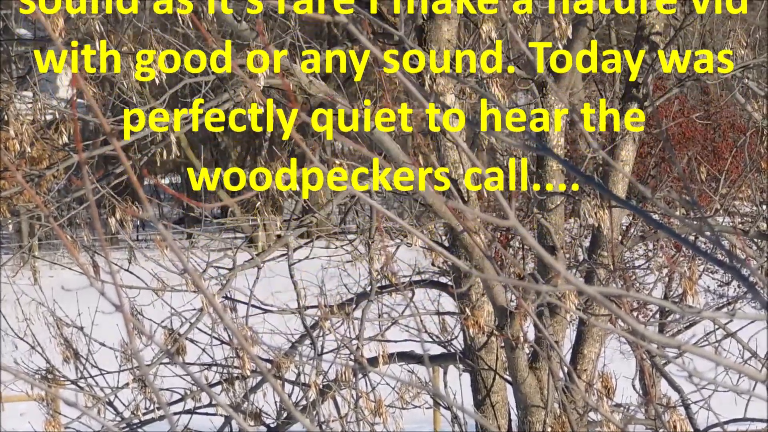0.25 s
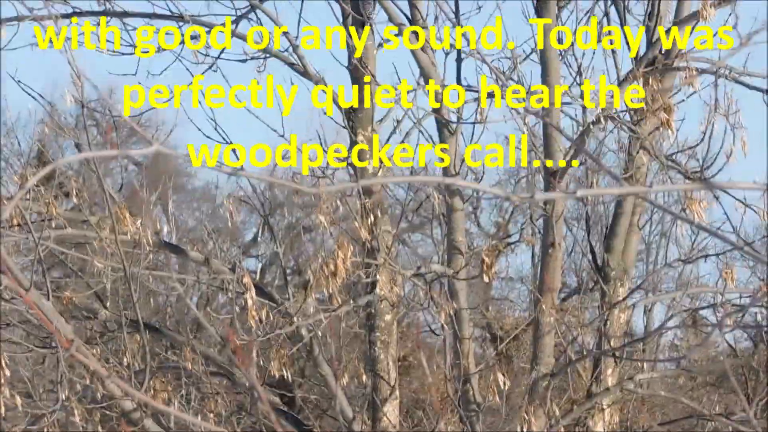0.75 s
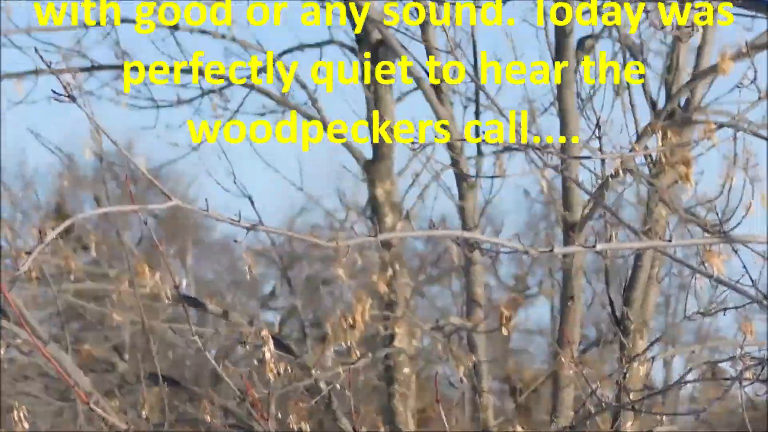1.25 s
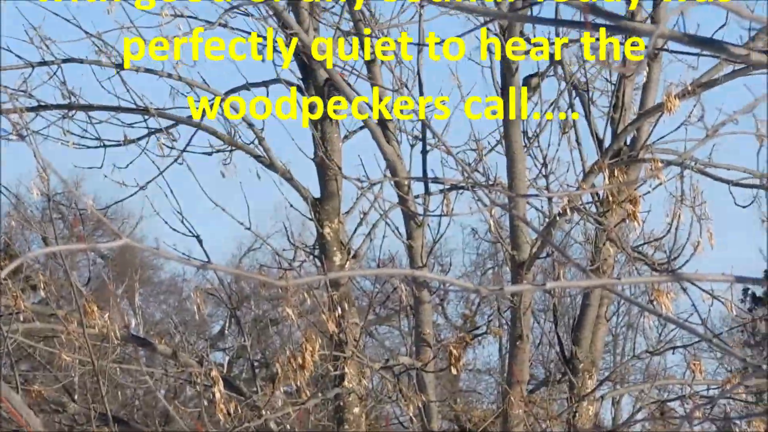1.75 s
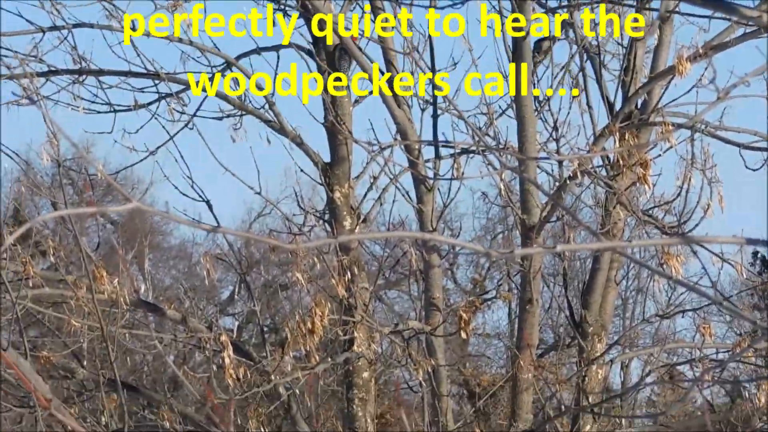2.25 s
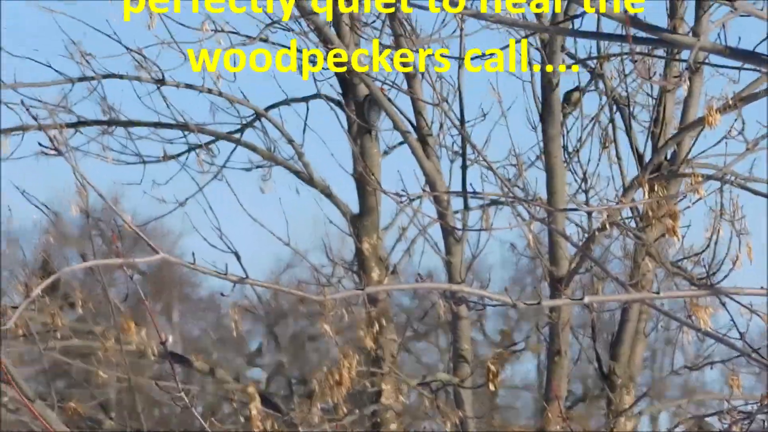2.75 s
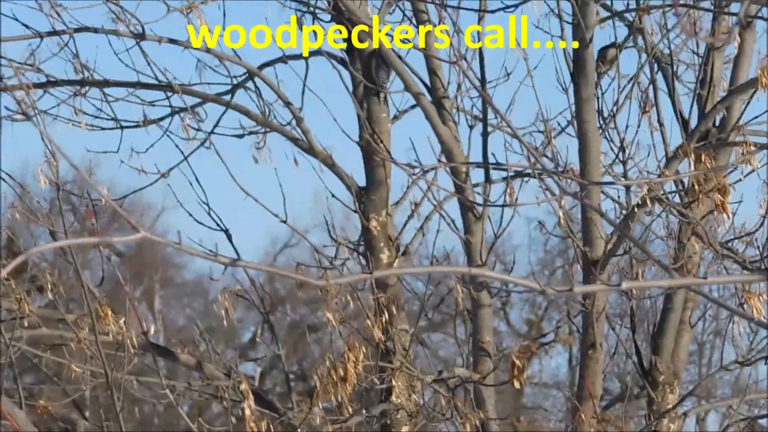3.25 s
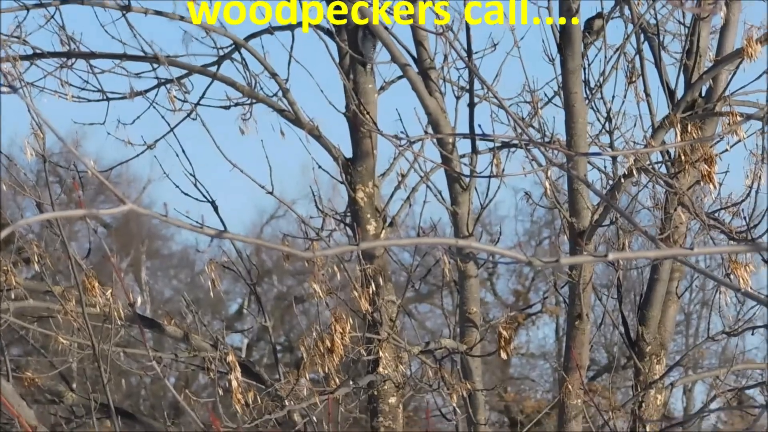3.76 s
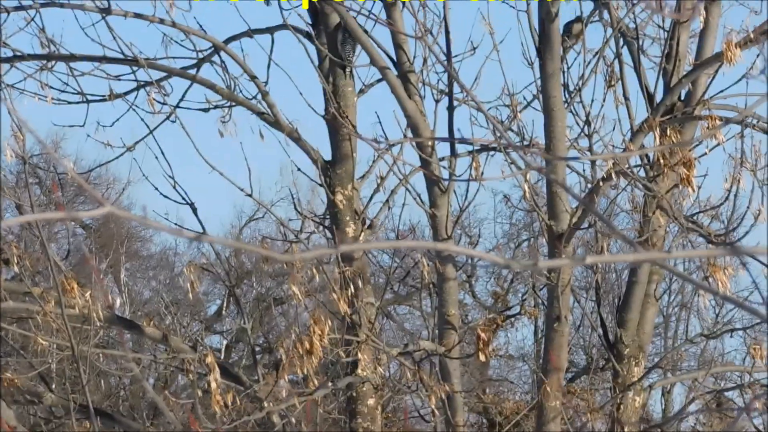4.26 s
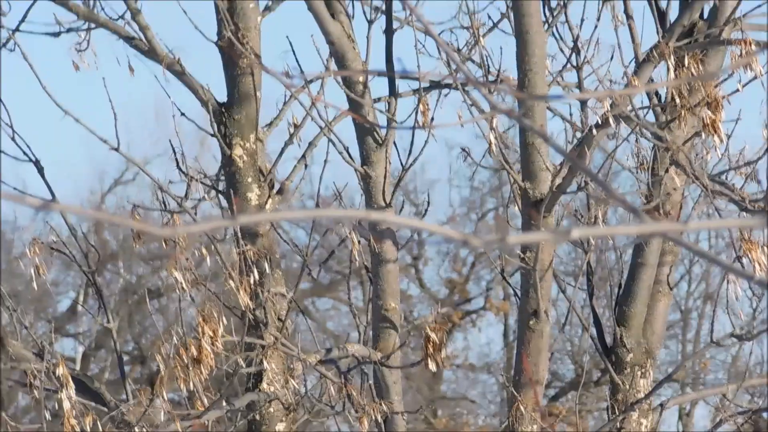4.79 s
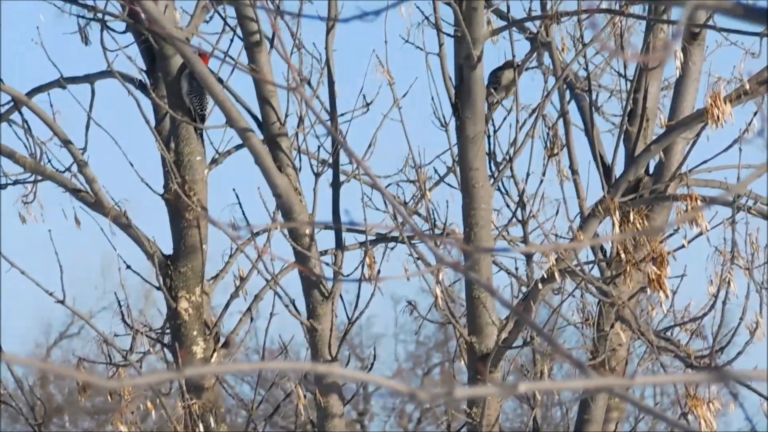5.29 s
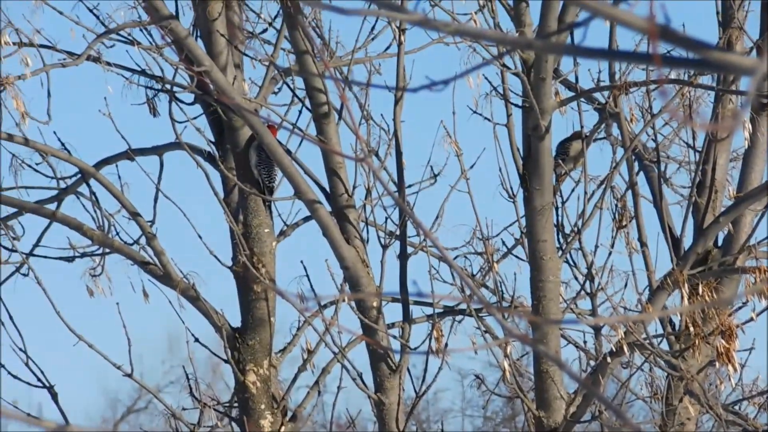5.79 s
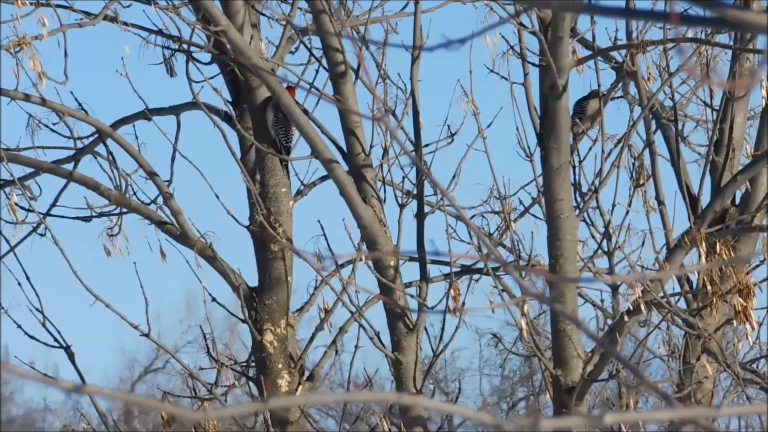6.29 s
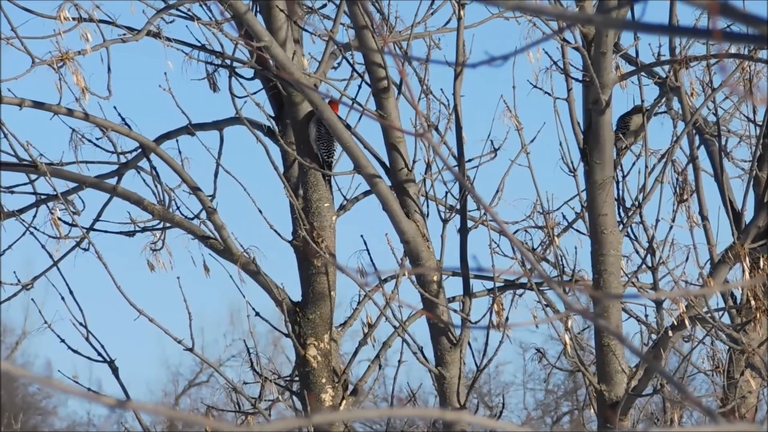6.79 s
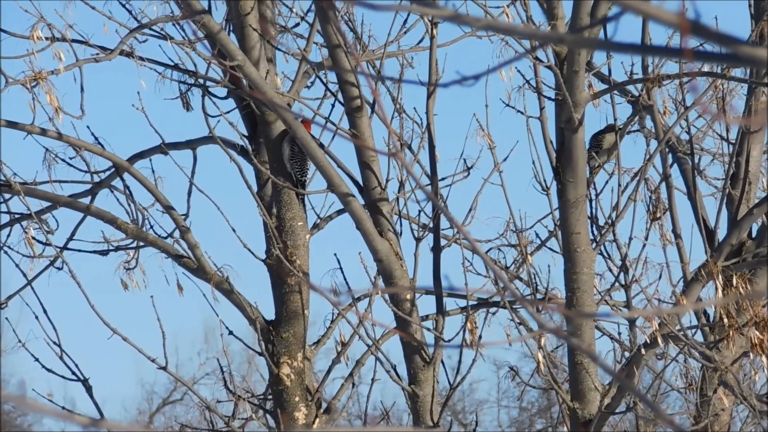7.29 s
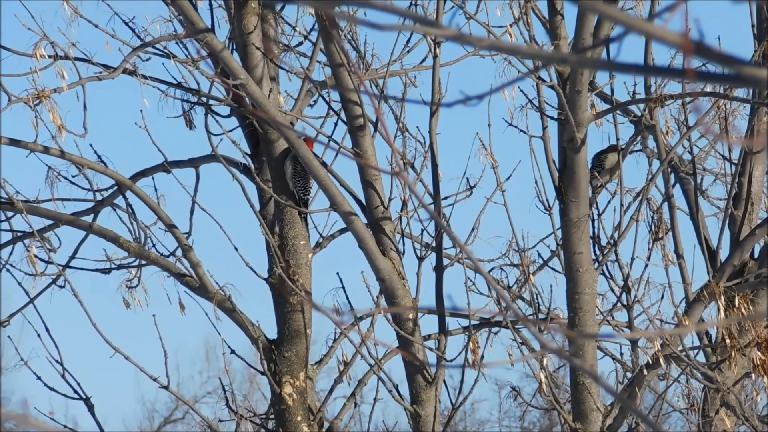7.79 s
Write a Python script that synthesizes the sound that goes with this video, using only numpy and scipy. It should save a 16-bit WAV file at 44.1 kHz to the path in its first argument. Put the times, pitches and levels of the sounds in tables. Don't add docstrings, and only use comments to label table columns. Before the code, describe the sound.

Quiet outdoor woodland, heard through a small camera's stereo microphone. A woodpecker's loud, slightly raspy chirps drop quickly in pitch and ring briefly among bare trees. Beneath them runs soft hiss and a nasal mechanical whirr, leaning left and swelling around five and a half and six and a half seconds. Plastic snaps, little focus ticks and a short scuff from a glove interrupt. Thin high chips from a smaller bird sit faintly to the left.

```python
import sys
import numpy as np
from scipy import signal
from scipy.fft import rfft, irfft, next_fast_len
from scipy.io import wavfile
from scipy.ndimage import uniform_filter1d

SR = 44100
rng = np.random.default_rng(int(sys.argv[2]) if len(sys.argv) > 2 else 0)


def rack_gain(trim_db):
    fader = np.asarray(trim_db, float)
    return 10 ** (fader / 20)


def output_pcm(signal):
    pcm = np.clip(np.atleast_2d(signal).T, -1, 1) * 32767
    wavfile.write(sys.argv[1], SR, np.round(pcm).astype(np.int16))


N = 354608
TIME = np.arange(N) / SR
WIDE = next_fast_len(N)
BINS_HZ = np.arange(WIDE // 2 + 1) * SR / WIDE
SIDES = np.array([[.5], [-.5]])
LONGEST, LAG = 9000, 5

# f/Hz, level/dB per Hz
AIR = [(25, -93), (60, -103), (130, -98.5), (300, -101), (600, -97.5), (1500, -96.5), (3500, -104),
       (5000, -109), (9000, -116), (16000, -119)]
# f/Hz, share
ALIKE = [(60, 0.61), (130, 0.9), (300, 0.18), (1400, 0.07), (3000, 0.018), (16000, 0.03)]
FRAME_HZ = 30 / 1.001
WHINE_HZ, WHINE_DB = 14795, -83

# f/Hz, width/Hz, level/dB
BODY = [
    [(250, 52, -16), (428, 44, -16), (589, 37, -1.5), (767, 160, -3.5), (1034, 34, -0.5), (1410, 210, -3)],
    [(1657, 77, -1), (1780, 92, -1), (1893, 205, 1), (2128, 200, -4.5)],
    [(2484, 28, -5), (2975, 130, 2), (3354, 40, -5), (3475, 99, -6)],
]
BODY_DB, BODY_SHARES = (-64.5, -61.5, -68.5), (0.28, 0.32, 0.63)
# t/s, level/dB
LOAD = [(0, -3), (.6, 1), (1.2, 1.5), (1.6, -2), (2.4, 2.5), (2.6, 4), (3.3, -3), (3.65, -5.5), (4.1, 0),
        (4.7, -1.5), (5.5, 7), (6.0, -1.5), (6.45, 7), (6.8, 2), (7.3, -1), (8.04, 1.5)]
# t/s, half length/s, level/dB
DRAGS = [
    (3.25, 0.39, 5),
    (6.61, 0.39, 5),
]
# f/Hz, width/Hz, level/dB
ZOOM = (1835, 220, -59.5)
ZOOM_S = 4.75

# high f/Hz, its length/s, low f/Hz, its length/s, f it sags to/Hz
NOTES = [(1631, .040, 1150, .052, 1070), (1552, .047, 1205, .042, 1200), (1690, .046, 1275, 0.061, 1230),
         (1623, .042, 1290, .056, 1164), (1612, .042, 1230, .070, 1100), (1594, .047, 1280, .062, 1150),
         (1624, .051, 1210, .068, 1150), (1533, .044, 1160, .068, 1140)]
# t/s, high note level/dB, low note level/dB,
# 2nd partial as the beak closes/dB, higher partials/dB
CALLS = [(.212, -33.5, -43, 2, -24), (0.745, -31, -39.5, -13, -23), (1.726, -37, -43, 0, -15),
         (2.103, -34.5, -44, -3, -14), (3.033, -33, -45, -7, -16.5), (3.375, -30.5, -44, -14.5, -16.5),
         (5.096, -29, -42, -22, -19), (6.455, -32.5, -43, -3, -17)]
# 2nd partial as the beak opens/dB, 2nd partial in the low note/dB,
# f where the last fall lingers/Hz, for how long/s
MANNERS = [(3, 5, 860, .036), (1.5, 1, 1020, .03), (3.5, 2, 1030, 0.0098), (1, 2.5, 900, 0.0018),
           (-6.5, 0, 830, 0.0088), (0, -5.5, 850, 0.0142), (-3, -5, 900, 0.0097), (1.5, 0, 800, 0.011)]
BOWS = (.05, .04, .03, .02, .1, .16, .17, .1)
BEAK_DB = (-3, 3, -3, 0.5, -7, 2.5, 4.5)
# f/Hz, level/dB
THROAT = [(2500, 24), (4000, -13.5), (5500, -7.5), (7000, 0.5), (8000, -5), (8600, -23), (11500, -18),
          (15500, -26)]
BREAK_S, FALL_HZ_PER_S, REST_HZ, DYING_S = .012, 13000, 624, 0.047
CATCH_S, ATTACK_S = 0.0089, 0.023
SILENT_DB, CATCH_DB, SWELL_DB, FADE_DB, DIE_DB = -23, -9, -1, -5.5, -14.5
OPEN_S, SHUT_DB = .0125, -9
BOW_AT, LOW_BOW = .72, .03
HOOK, HOOK_AT_S, HOOK_S = .085, .008, .0045
PUFF_S, PUFF_DB = .013, 13
SLACK_HZ, SLACK_DB_PER_HZ = 1145, 0.0617
THIRD_DB, THIRD_SHARE, UPPER_SHARE, STRAIN_DB, SLACK_LIFT_DB = -11.5, 0.95, 0.11, 6.5, 2.5
DIP_HZ, DIP_WIDTH_HZ, DIP_DB = 1400, 72, -13.5

# delay/s, left level/dB, right level/dB
TRUNKS = [(.006, -25, -7), (.013, -16.5, -33.5), (.024, -15, -38), (.048, -19, -15), (.075, -41, -43)]
WOOD_DB, WOOD_T60_S, FAR_DB, FAR_T60_S = -7.5, 0.29, -17.5, 0.98
SCATTER_HZ = 2180

# t/s, ring f/Hz, width/Hz, left level/dB, right level/dB
SNAPS = [(.3179, 2100, 700, -60, -8), (.3183, 2100, 700, -19, -60), (.3194, 1500, 650, -15, -30),
         (.3219, 1700, 800, -23, -26), (.3183, 5200, 2500, -28, -26), (.828, 2300, 1500, -11, -40),
         (.8284, 2600, 700, -25, -26), (.8281, 6500, 4000, -20, -38), (.828, 400, 400, -33, -46)]
# t/s, peak level/dB, left minus right/dB
TICKS = [(0.5324, -71, -4), (0.559, -47.5, 19), (0.617, -50, 9), (0.628, -58, -1), (1.1393, -44, 14),
         (2.677, -45, -7), (2.7546, -36, -10), (2.8744, -44, 10), (6.0744, -63, 1.5)]
# t/s, peak level/dB, f/Hz
SCUFFS = [(2.745, -37, 1400), (2.747, -47, 950), (2.755, -40, 1500), (2.96, -35.5, 2540), (2.963, -44, 685),
          (2.963, -38.5, 925), (2.968, -31, 2740)]
# t/s, level/dB
RUB = [(2.954, -68), (2.961, -49), (2.975, -42), (2.99, -45), (3.03, -46), (3.1, -46), (3.15, -48),
       (3.175, -61), (3.3, -66)]
# f/Hz, level/dB per Hz
RUB_COLOUR = [(88, -42), (150, -19.5), (598, -10.5), (801, -3), (1010, -3), (1930, -11), (4040, -9),
              (4370, -13.5), (14100, -32.5), (15800, -43)]

# t/s, peak level/dB, middle ring level/dB
STEPS = [(0.486, -46, 3), (1.247, -47.5, -13), (1.292, -47.5, -6), (1.303, -48, -15), (1.363, -45, -12),
         (1.389, -53, -7), (2.613, -48.5, -16), (2.657, -47.5, -7), (2.689, -44, -7.5), (2.743, -40, -3),
         (2.754, -56, 11), (2.785, -46.5, -8), (2.813, -43, -12), (2.842, -56, -20), (3.263, -44.5, -8),
         (3.887, -48, -5), (3.896, -46, -10), (3.999, -48.5, -12), (4.239, -51, -14), (4.261, -47, -6.5),
         (4.298, -47.5, -10), (6.074, -55, 0), (6.129, -46.5, -2), (6.142, -47, -8)]
# first t/s, last t/s, first level/dB, last level/dB, middle ring level/dB
RUNS = [
    (4.028, 4.196, -46.5, -47, -11),
    (6.236, 6.367, -49, -45.5, -5),
    (6.436, 6.468, -43.5, -43, -4),
]
# f/Hz, width/Hz, level/dB
STEP_RINGS = [(1023, 200, -1), (620, 220, -8.5), (2074, 370, 2), (3020, 440, 4), (4000, 330, 8)]
UPPER_RING_DB, UPPER_FOLLOWS, RUN_BITE_DB, STEP_PAN_DB = -16, .4, 6, 7.5

# t/s, from f/Hz, to f/Hz, level/dB, left minus right/dB
CHIPS = [
    (.683, 5450, 7200, -48.5, 14),
    (6.221, 5750, 7540, -52.5, 14.5),
    (4.42, 4900, 5300, -71, 16),
    (4.462, 5200, 4850, -69, 10),
]
CHIP_S, CHIP_RISE_S, CHIP_ATTACK_S, CHIP_FADE_DB_PER_S = 0.018, 0.0057, 0.0023, 500


def curve(rows, t=TIME):
    s, *columns = np.transpose(rows)
    return [np.interp(t, s, c) for c in columns]


def colour(points, hz):
    f, v = np.transpose(points)
    return np.interp(np.log(np.maximum(hz, 1)), np.log(f), v)


def ring(x, hz, width):
    return signal.lfilter(*signal.iirpeak(hz, hz / width, SR), x)


def unit(x):
    return x / np.sqrt(np.mean(x ** 2))


def walk(rate, size=N):
    place = np.arange(size) * rate / SR
    levels = rng.standard_normal(int(size / SR * 400) + 2)
    k = place.astype(int)
    blend = np.sin(np.pi / 2 * (place - k)) ** 2
    return 1.63 * (levels[k] + (levels[k + 1] - levels[k]) * blend)


def mingle(alike, shared, left, right):
    return np.sqrt(alike) * shared + np.sqrt(1 - alike) * np.array([left, right])


def pair(alike):
    shared, left, right = rng.standard_normal((3, N))
    return mingle(alike, np.array([shared, np.roll(shared, LAG)]), left, right)


def add(out, s, sound):
    i = int(s * SR)
    out[:, i:i + sound.shape[-1]] += sound


def air():
    shared, left, right = rfft(rng.standard_normal((3, WIDE)))
    alike = np.clip(colour(ALIKE, BINS_HZ), 0, 1)
    sound = mingle(alike, shared, left, right) * rack_gain(colour(AIR, BINS_HZ)) * np.sqrt(SR / 2)
    bass_share = 1 / (1 + (BINS_HZ / 70) ** 4)
    bass = irfft(sound * bass_share, WIDE)[:, :N]
    rest = irfft(sound * (1 - bass_share), WIDE)[:, :N]
    return bass * rack_gain(2 * walk(1.514)) + rest * rack_gain(0.4 * walk(3.04))


def whine():
    frames = TIME * FRAME_HZ - .13
    reading = uniform_filter1d((frames % 1 < .48) * (-1.) ** np.floor(frames), size=90)
    return rack_gain(WHINE_DB + 1.6 * walk(20) + SIDES * 2) * reading * np.sin(2 * np.pi * WHINE_HZ * TIME)


def whirr():
    out, load = 0, curve(LOAD)[0]
    drag = sum(db * np.exp(-((TIME - s) / half) ** 2) for s, half, db in DRAGS)
    extras, pans_db, likeness = (drag, 0, 0), (4.5, 4.1, 6.1), (.55, .6, .3)
    for modes, db, share, more, pan_db, alike in zip(BODY, BODY_DB, BODY_SHARES, extras, pans_db, likeness):
        noise, group = pair(alike), 0
        for k, (hz, width, mode_db) in enumerate(modes):
            group = group + rack_gain(mode_db + 1.57 * walk(12)) * unit(ring(noise, hz, width)) * (-1) ** k
        out = out + unit(group) * rack_gain(db + share * load + more + 2.0 + SIDES * pan_db)
    hz, width, db = ZOOM
    db = db + 1.7 * walk(12)
    second_motor = unit(ring(ring(pair(0.69), hz, width), hz, width))
    return out + (TIME > ZOOM_S) * rack_gain(db + SIDES * 5.0) * second_motor


def cry(age, notes, call, manner, bow):
    high_hz, snap, low_hz, low_s, sag_hz = notes
    _, high_db, low_db, closed_db, bright_db = call
    open_db, low_beak_db, linger_hz, linger_s = manner
    before, after, fall = snap - BREAK_S, snap + BREAK_S, snap + low_s
    linger = fall + (sag_hz - linger_hz) / FALL_HZ_PER_S
    end = fall + DYING_S + linger_s
    high = high_hz * (1 - bow * (np.maximum(age, OPEN_S) / before / BOW_AT - 1) ** 2)
    run = np.clip((age - after) / (fall - after), 0, 1)
    low = low_hz * (1 + LOW_BOW * np.sin(np.pi * run)) + (sag_hz - low_hz) * run ** 2
    falling_s = np.maximum(age - fall, 0) - np.clip(age - linger, 0, linger_s)
    low = np.maximum(low - FALL_HZ_PER_S * falling_s, REST_HZ)
    broken = np.sin(np.pi / 2 * np.clip((age - before) / (after - before), 0, 1)) ** 2
    hz = high + (low - high) * broken
    effort = np.interp(age, [0, CATCH_S, ATTACK_S, before, after, fall, end],
                       [high_db + SILENT_DB, high_db + CATCH_DB, high_db + SWELL_DB, high_db,
                        low_db, low_db + FADE_DB, low_db + FADE_DB + DIE_DB])
    beak_db = np.insert(BEAK_DB, 2, closed_db) + [0, open_db, 0, 0, low_beak_db, low_beak_db, low_beak_db, 0]
    beak = np.interp(age, [OPEN_S, OPEN_S + 0.0022, before, snap, after, (after + fall) / 2, fall, end], beak_db)
    strain = STRAIN_DB * np.exp(-((age - snap) / BREAK_S) ** 2) + SLACK_LIFT_DB * broken
    shut = SHUT_DB * np.clip((OPEN_S - age) / HOOK_S * 2, 0, 1)
    first = effort + DIP_DB * np.exp(-((hz - DIP_HZ) / DIP_WIDTH_HZ) ** 2)
    third = effort + THIRD_DB + THIRD_SHARE * beak + shut
    upper = effort + bright_db + UPPER_SHARE * beak + strain + shut
    return hz, first, effort + beak, third, upper


def woodpecker():
    out = np.zeros((2, N))
    for notes, call, manner, bow in zip(NOTES, CALLS, MANNERS, BOWS):
        tremble = 0.00846 * walk(296.8, size=LONGEST)
        flutter = np.array([[walk(110, size=LONGEST) for _ in range(12)] for _ in range(2)])
        air_noise = rng.standard_normal((2, LONGEST))
        fall = notes[1] + notes[3]
        size = min(int((fall + DYING_S + manner[3]) * SR), LONGEST)
        t = TIME[int(call[0] * SR):][:size]
        age = t - t[0]
        hz, first, second, third, upper = cry(age, notes, call, manner, bow)
        sharp = HOOK * np.exp(-((age - HOOK_AT_S) / HOOK_S) ** 2)
        shake = tremble[:len(t)] * (0.74 + 60 * np.maximum(age - fall + 0.017, 0))
        phase = 2 * np.pi * np.cumsum(hz * (1 + sharp + shake)) / SR
        slack_db = SLACK_DB_PER_HZ * np.maximum(SLACK_HZ - hz, 0)
        overtones = [upper - .3 * slack_db + colour(THROAT, k * hz) for k in range(4, 13)]
        levels = [first - 0.32 * slack_db, second - 0.053 * slack_db, third - 0.11 * slack_db] + overtones
        depth_db = 0.59 + 26 * age
        tone = 0
        for k, (db, both, apart) in enumerate(zip(levels, *flutter[..., :len(t)]), 1):
            level = rack_gain(db + depth_db * min(k / 2, 1) * both + SIDES * 0.7 * min(k, 6) * apart)
            tone = tone + level * np.sin(k * (phase - SIDES * 0.22) + k * k)
        puff_db = PUFF_DB * np.exp(-((age - PUFF_S) / HOOK_S) ** 2)
        effort_db = np.maximum(second, first) + puff_db + 0.37 * slack_db
        rasp = ring(air_noise, 2500, 2600) + rack_gain(-15) * ring(air_noise, 6600, 3500) + rack_gain(-27) * air_noise
        rasp = rack_gain(effort_db - 18) * rasp[:, :len(t)] * (1 + 0.34 * np.cos(phase))
        add(out, t[0], (np.sqrt(2) * tone + rasp) * signal.windows.tukey(len(t), .06))
    return out


def woodland(x):
    t = TIME[:SR]
    near = rack_gain(WOOD_DB - 60 * t / WOOD_T60_S) / np.sqrt(WOOD_T60_S)
    far = rack_gain(FAR_DB - 60 * t / FAR_T60_S) / np.sqrt(FAR_T60_S)
    reply = rng.standard_normal((2, SR)) * (near + far) * np.sqrt(2 * np.log(1000) / SR)
    reply *= np.clip(t / .015, 0, 1)
    for s, left_db, right_db in TRUNKS:
        bark = unit(rng.standard_normal((2, 36))) / 6
        add(reply, s, bark * rack_gain(np.array([[left_db], [right_db]])))
    reply = signal.lfilter(*signal.butter(1, SCATTER_HZ, "high", fs=SR), reply)
    reply[:, 0] = 1
    return signal.oaconvolve(x, reply[:, :SR * 2 // 3], axes=1)[:, :N]


def blip(hz, width):
    t = TIME[:600]
    wave = np.sin(2 * np.pi * hz * t) * t * np.exp(-2 * np.pi * width * t)
    return wave / abs(wave).max()


def casing():
    out = np.zeros((2, N))
    for s, hz, width, left_db, right_db in SNAPS:
        add(out, s, -rack_gain(np.array([[left_db], [right_db]])) * blip(hz, width / 2))
    for s, db, pan_db in TICKS:
        add(out, s, rack_gain(db + SIDES * pan_db) * blip(4000, 2600))
    for s, db, hz in SCUFFS:
        add(out, s, rack_gain(db - 2.5 + SIDES * 17) * blip(hz, 0.18 * hz))
    fibres = pair(.15) * rack_gain(1.5 * walk(380))
    slide = irfft(rfft(fibres, WIDE) * rack_gain(colour(RUB_COLOUR, BINS_HZ)), WIDE)[:, :N]
    on = (TIME > RUB[0][0]) & (TIME < RUB[-1][0])
    return out + on * unit(slide) * rack_gain(curve(RUB)[0] + SIDES * 5)


def focus():
    out, t = np.zeros((2, N)), TIME[:LONGEST // 4]
    steps = [(s, db, middle_db, 0) for s, db, middle_db in STEPS]
    for first, last, first_db, last_db, middle_db in RUNS:
        count = round((last - first) * FRAME_HZ) + 1
        run = np.linspace((first, first_db), (last, last_db), count)
        steps += [(s, db, middle_db, RUN_BITE_DB) for s, db in run]
    swell = np.exp(-t / .004) * (1 - np.exp(-t / 0.0018))
    rattles = rng.standard_normal((len(steps), len(t))) * swell
    chances = rng.standard_normal((len(steps), 3))
    for (s, db, middle_db, bite_db), rattle, chance in zip(steps, rattles, chances):
        upper_db = UPPER_RING_DB + UPPER_FOLLOWS * middle_db + bite_db + 1.5 * chance[0]
        shares = (0, 0, middle_db, (middle_db + upper_db) / 2, upper_db)
        knock = 0
        for (hz, width, ring_db), more in zip(STEP_RINGS, shares):
            rung = ring(ring(rattle, hz, width), hz, width)
            knock = knock + rack_gain(ring_db + more) * rung / abs(rung).max()
        pan_db = STEP_PAN_DB + 0.61 * chance[1]
        db = db + 1.1 * chance[2]
        add(out, s - .002, rack_gain(db + 1.5 + SIDES * pan_db) * np.array([knock, np.roll(knock, LAG)]))
    return out


def small_bird():
    out, age = np.zeros((2, N)), TIME[:int(CHIP_S * SR)]
    attack = np.minimum(age / CHIP_ATTACK_S, 1) ** 2
    shape = attack * rack_gain(-CHIP_FADE_DB_PER_S * age) * np.minimum((CHIP_S - age) / 0.0046, 1)
    for s, from_hz, to_hz, db, pan_db in CHIPS:
        hz = to_hz + (from_hz - to_hz) * np.exp(-(age / CHIP_RISE_S) ** 1.8)
        whistle = np.sin(2 * np.pi * np.cumsum(hz) / SR)
        add(out, s, np.sqrt(2) * rack_gain(db - 0.5 + SIDES * pan_db) * shape * whistle)
    return out


def scene():
    chips = small_bird()
    birds = woodland(woodpecker() + 0.4 * chips) + 0.53 * chips
    return birds + whirr() + focus() + casing() + air() + whine()


def top_cut(x):
    return signal.sosfilt(signal.butter(12, 16470, fs=SR, output="sos"), x)


def record(dry):
    low_pass = signal.ellip(10, .2, 45, 15800, fs=SR, output="sos")
    mix = signal.sosfilt(low_pass, dry)
    return top_cut(mix)


dry = scene()
out = record(dry)
output_pcm(out)
```